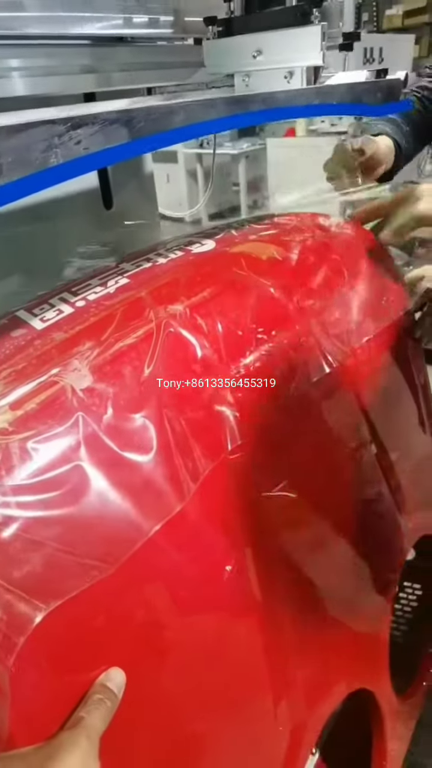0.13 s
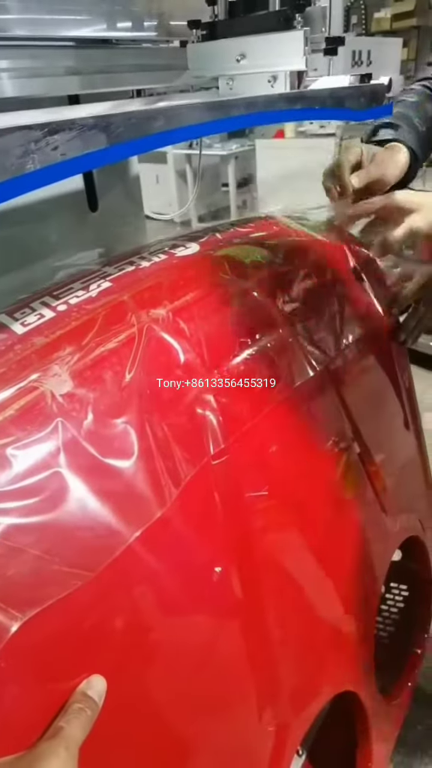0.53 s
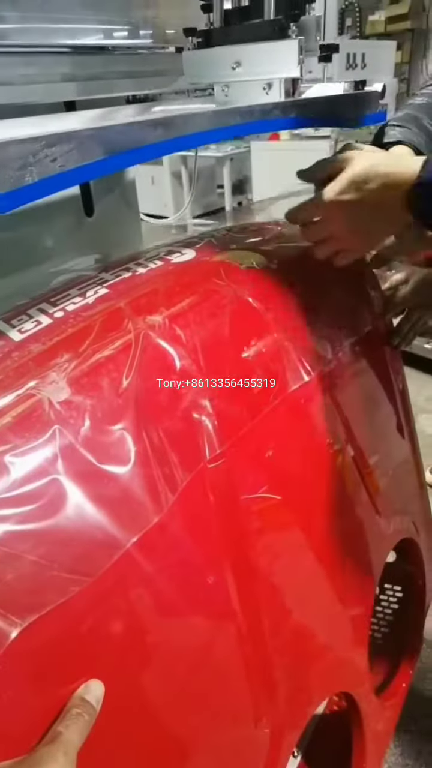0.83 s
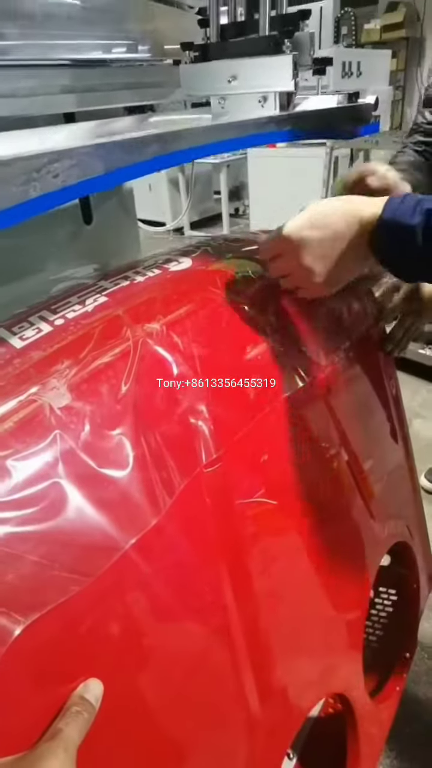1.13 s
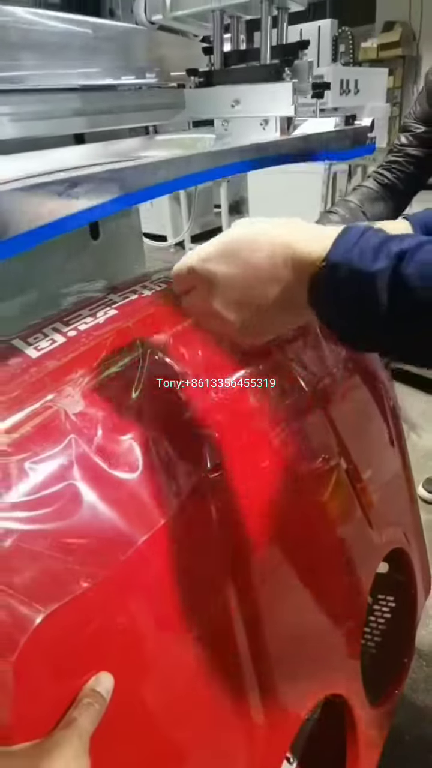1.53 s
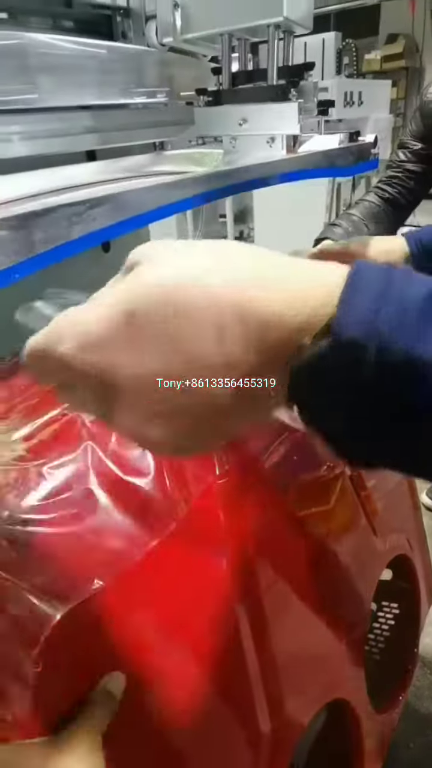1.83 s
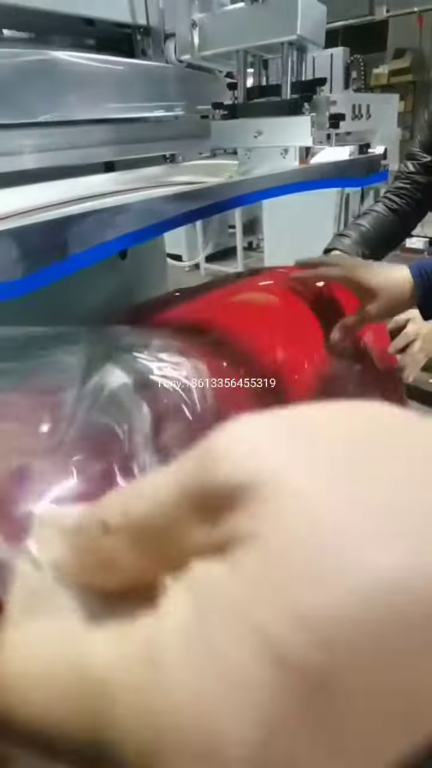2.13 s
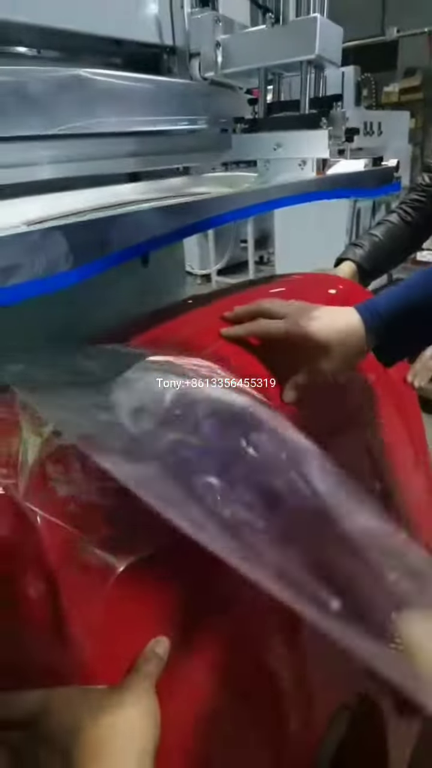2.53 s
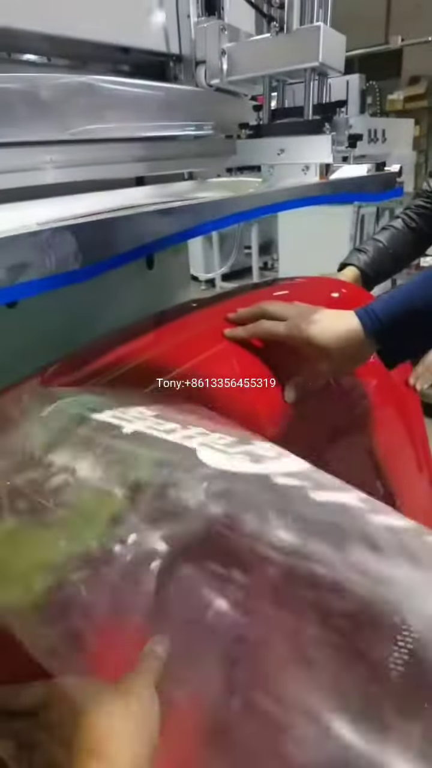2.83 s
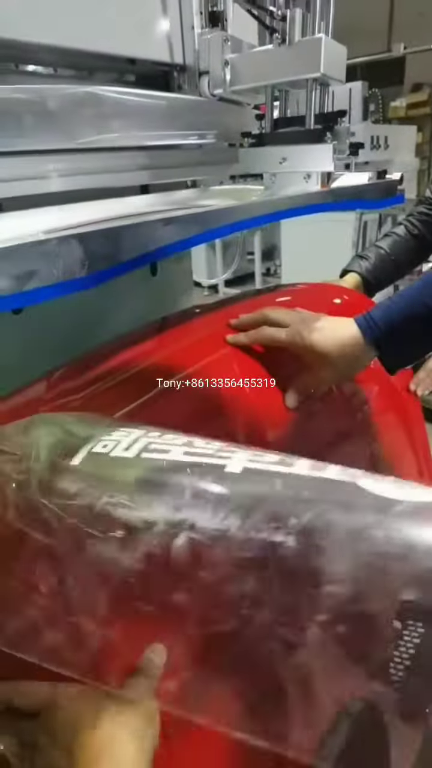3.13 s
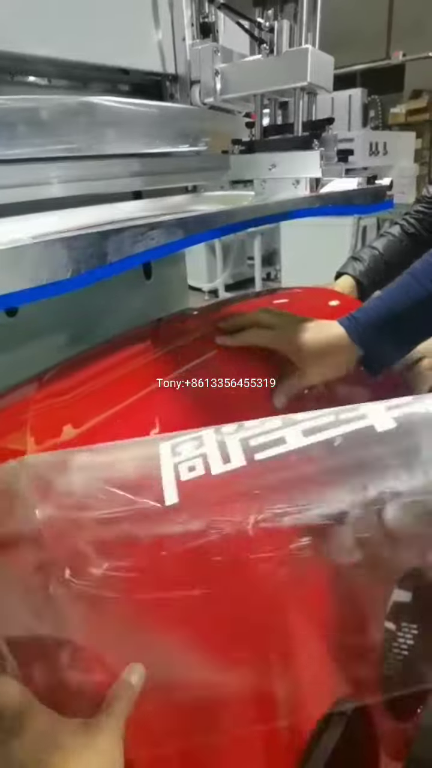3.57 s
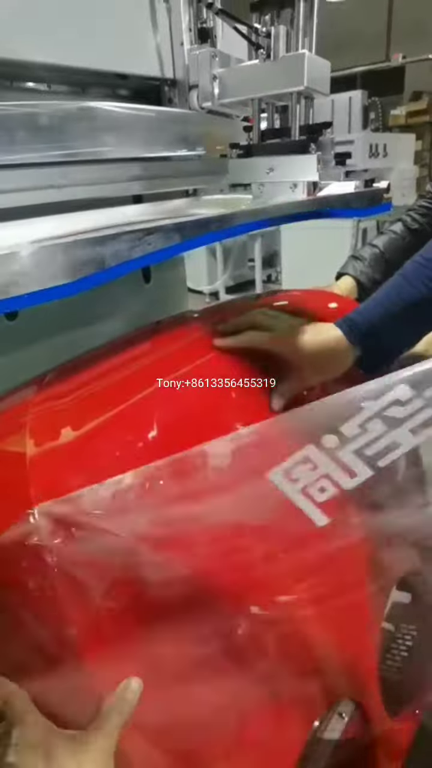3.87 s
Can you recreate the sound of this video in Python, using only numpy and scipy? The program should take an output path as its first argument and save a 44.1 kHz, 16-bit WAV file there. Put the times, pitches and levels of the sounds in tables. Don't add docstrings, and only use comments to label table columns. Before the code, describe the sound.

Plastic film peels off a curved hollow casing with crackling rips and bright tearing hiss

```python
import sys
import numpy as np
from scipy import signal
from scipy.fft import rfft, irfft
from scipy.io import wavfile
from scipy.ndimage import uniform_filter1d, minimum_filter1d

SR = 44100
rng = np.random.default_rng(int(sys.argv[2]) if len(sys.argv) > 2 else 0)


def volts_from_decibels(level):
    exponent = np.asarray(level, float) / 20
    return 10 ** exponent


def store_pcm(level_fs):
    pcm = np.round(np.clip(level_fs, -1, 1) * 32767).astype(np.int16)
    wavfile.write(sys.argv[1], SR, np.atleast_2d(pcm).T)


N = 176400

# pitch_hz, density_db (per Hz)
MACHINE_RUMBLE = [(25, -10), (300, -2.5), (700, -7.5), (1500, -25.5), (4000, -11), (9000, -45)]
# pitch_hz, width_hz, level_db
MOTOR_HUM = [
    (51.5, 1, -8.5),
    (114, 19, -6),
    (196.7, 18, -9.5),
]
# start_s, level_db
MACHINE_LEVEL = [
    (0.0, -53),
    (0.62, -57),
    (4.0, -73.5),
]
# start_s, level_db, slack_body_db
PULLS = [
    [(0, -44, 9), (.035, -54, 7), (.09, -36, 0.5), (.19, -31, 2), (.26, -49.5, 11.5), (.35, -49, -0.5)],
    [(.42, -47, 2), (.5, -51, 12), (.65, -43.5, -7), (.79, -43.5, -3), (.84, -26.5, -6), (.9, -37.5, -4),
     (.97, -39.5, 1), (1.04, -32, -3.5), ],
    [(1.2, -26.5, -7.5), (1.47, -24, -7.5), (1.7, -22, -5.5), (1.81, -24, -7), (1.9, -23, -6),
     (2.15, -27.5, -2), (2.27, -30, -3.5), (2.33, -45.5, 5)],
    [(2.44, -68, 17.5), (2.56, -34.5, -3), (2.62, -37, -2), (2.8, -26.5, -3.5), (2.83, -32, -2),
     (2.9, -25.5, -2), (2.94, -29, -7), (3.05, -42.5, -2.5)],
    [(3.07, -40, 2), (3.165, -36.5, 1.5), (3.18, -43, 0)],
    [(3.2, -48.5, -2), (3.386, -43.5, 1), (3.393, -32, -3), (3.6, -32.5, -1), (3.626, -35, -5.5)],
    [(3.632, -38, 7.5), (3.67, -36.5, -1.5), (3.685, -31, -4), (3.82, -40, 3.5), (3.915, -39.5, -4),
     (3.935, -31, -9)],
]
# start_s, peak_db, t60_s
EARLY_RIPS = [(0.044, -20.5, 0.08), (0.1102, -9.5, 0.045), (0.164, -4, 0.1), (0.2054, -8, 0.13),
              (0.3723, -7.5, 0.0093), (0.4369, -12, 0.049), (0.4561, -10.5, 0.059), (0.4756, -10.5, 0.039),
              (0.5277, -5.5, 0.063), (0.555, -9.5, 0.057), (0.5651, -16, 0.048), (0.6, -12, 0.019),
              (0.6146, -7, 0.055), (0.6683, -14, 0.1), (0.715, -12, 0.021), (0.7333, -8.5, 0.025),
              (0.7628, -14, 0.075), (0.7816, -3.5, 0.029), (0.833, -17, 0.051), (0.8547, -9, 0.052),
              (0.8769, -10, 0.083), (0.9263, -10, 0.082), (1.0281, -11, 0.046), (1.058, -8.5, 0.037),
              (1.1315, -8, 0.038), (1.167, -19, 0.035)]
# start_s, peak_db, t60_s
SMALL_RIPS = [(0.0593, -13, 0.13), (0.1038, -28, 0.014), (0.1424, -15, 0.033), (0.1776, -19, 0.099),
              (0.4895, -7, 0.029), (0.4943, -13.5, 0.12), (0.536, -29, 0.1), (0.675, -9.5, 0.018),
              (0.6854, -23, 0.03), (0.6952, -14, 0.015), (0.7436, -16, 0.02), (0.756, -24, 0.039),
              (0.7892, -12.5, 0.025), (0.8056, -9, 0.049), (0.814, -22, 0.021), (0.9434, -13, 0.019),
              (1.0811, -6.5, 0.068), (1.1953, -15, 0.039), (1.2034, -5.5, 0.043), (2.313, -22, 0.017),
              (2.3296, -24, 0.025), (2.3454, -17, 0.014), (2.357, -23, 0.04), (2.4584, -21, 0.018),
              (2.467, -25, 0.027), (2.4814, -14.5, 0.017), (2.5114, -16, 0.021), (2.9267, -21, 0.03)]
# start_s, peak_db, t60_s
LATE_RIPS = [(2.378, -16.5, 0.084), (2.4072, -19, 0.036), (2.4221, -17.5, 0.098), (2.4499, -14, 0.1),
             (2.4956, -16, 0.035), (2.5067, -19, 0.014), (2.5263, -13, 0.032), (2.5526, -11.5, 0.052),
             (2.587, -11.5, 0.016), (3.058, -10.5, 0.038), (3.0844, -12, 0.025), (3.1125, -16, 0.035),
             (3.1223, -12.5, 0.044), (3.1354, -14, 0.032), (3.158, -18, 0.032), (3.167, -13, 0.048),
             (3.2118, -22, 0.027), (3.2224, -19.5, 0.061), (3.2974, -15.5, 0.02), (3.349, -15.5, 0.1),
             (3.3907, -17, 0.038), (3.4374, -9, 0.035), (3.5554, -27, 0.02), (3.5696, -12.5, 0.038),
             (3.6293, -9.5, 0.059), (3.679, -18.5, 0.032), (3.8697, -18, 0.045), (3.89, -21, 0.02),
             (3.925, -15.5, 0.028), (3.9687, -10.5, 0.045)]
# start_s, peak_db
FAINT_RIPS = [(0.835, -5.5), (0.9188, -20), (2.3867, -25), (2.412, -19), (2.4273, -18.5), (2.4776, -14),
              (2.539, -17), (2.5742, -12), (2.68, -16), (3.005, -20), (3.024, -23), (3.0338, -21.5),
              (3.078, -19), (3.103, -17.5), (3.1466, -18), (3.2387, -20), (3.2685, -27), (3.3044, -27),
              (3.3355, -19.5), (3.342, -14), (3.3614, -19), (3.3918, -21), (3.4543, -12), (3.905, -14),
              (3.9492, -14)]
# pitch_hz, density_db (per Hz)
TAUT_FILM = [(900, -47), (1600, -25.5), (3000, -13), (5200, -12.5), (7500, -11.5), (9400, -8.5),
             (11500, -9.5), (15400, -8)]
# pitch_hz, density_db (per Hz)
SLACK_BODY = [(150, -7), (300, -6.5), (750, 2), (1500, 1), (3000, 0), (4600, -7), (6500, -51)]
# centre_s, length_s, pitch_hz, level_db
BOOMS = [
    (0.19, 0.12, 635, -42.5),
    (1.658, 0.18, 773, -38.5),
    (1.883, 0.08, 820, -41.5),
    (2.18, 0.29, 321, -47.5),
    (2.51, 0.14, 320, -55),
    (3.585, 0.053, 576, -48),
]
# start_s, treble_db
APPROACH = [
    (0, -19),
    (.8, -3.5),
    (1.5, -1),
]
# start_s, length_s
CHOPPED = [(.03, .025), (.095, .025), (.355, .125), (.525, .02), (.59, .015), (.655, .15), (.908, .025),
           (1.058, .022), (2.36, .145), (3.04, .025), (3.19, .045), (3.297, .065), (3.618, .022),
           (3.873, .06)]
# start_s, length_s, low_hz, high_hz
LOST_BANDS = [(.612, .018, 3000, 3900), (.635, .028, 5100, 6900), (1.125, .035, 2900, 3900),
              (1.145, .015, 4800, 6500), (1.225, .04, 3200, 4300), (1.335, .04, 3200, 5200),
              (1.405, .033, 3300, 6300), (1.52, .025, 3500, 6000), (1.595, .055, 3700, 6800),
              (1.682, .032, 4100, 6800), (1.8, .022, 3500, 6800), (1.893, .035, 4400, 6300),
              (1.96, .13, 4700, 5300), (2.0, .035, 4600, 6500), (2.148, .018, 4500, 6700),
              (2.232, .045, 4600, 5700), (2.39, .115, 5900, 7600), (2.655, .025, 5800, 7800),
              (2.745, .02, 5800, 7000), (2.79, .022, 3400, 5000), (2.83, .025, 3600, 6700),
              (2.915, .025, 4500, 6700), (3.195, .04, 4500, 6500), (3.28, .018, 5400, 6500),
              (3.32, .042, 4500, 7600), (3.405, .02, 4500, 6700), (3.45, .03, 4500, 6600),
              (3.53, .02, 4500, 6400), (3.58, .02, 4300, 5000), (3.665, .03, 4500, 6500),
              (3.77, .045, 4500, 6500), (3.895, .03, 3600, 7200), (3.935, .022, 3800, 7800)]


def rms_one(x):
    return x / np.sqrt(np.mean(x ** 2) + 1e-20)


def in_time(rows):
    s, *columns = np.transpose(rows)
    return [np.interp(np.arange(N) / SR, s, c) for c in columns]


def drift(rate_hz):
    r = np.exp(-40 * np.pi * rate_hz / SR)
    noise = rng.standard_normal(N // 20 + 2002)
    slow = signal.lfilter([1], [1, -2 * r, r * r], noise)[2000:]
    return np.interp(np.arange(N) / 20, np.arange(len(slow)), rms_one(slow))


def bank(x, spectrum, patchy_db, rate_hz):
    hz, db = np.transpose(spectrum)
    octave = np.log2(np.maximum(np.arange(N // 2 + 1) * SR / N, 1))
    fall_db = 30 * np.maximum(octave - np.log2(hz[-1]), 0)
    shape = volts_from_decibels(np.interp(octave, np.log2(hz), db, left=-90) - fall_db)
    whole = rfft(x) * shape / np.sqrt(np.mean(shape ** 2))
    out = 0
    for centre in np.arange(np.log2(hz[0]), np.log2(SR / 2), .5):
        band = irfft(whole * np.maximum(1 - 2 * abs(octave - centre), 0), N)
        out = out + volts_from_decibels(patchy_db * drift(rate_hz)) * band
    return out


def resonate(x, hz, width_hz):
    r = np.exp(-np.pi * width_hz / SR)
    rise = np.array([1, 0, -1]) * (1 - r * r) / 2
    return signal.lfilter(rise, [1, -2 * r * np.cos(2 * np.pi * hz / SR), r * r], x)


def machines():
    hum = sum(volts_from_decibels(db) * rms_one(resonate(rng.standard_normal(N), hz, width))
              for hz, width, db in MOTOR_HUM)
    rumble = bank(rng.standard_normal(N), MACHINE_RUMBLE, 1.5, 1.26)
    return volts_from_decibels(in_time(MACHINE_LEVEL)[0] + 7.5) * (rumble + hum)


def slips(level_db):
    slips_per_s, spread_db, clump_db = 14000, 2.05, 1.47
    tears_per_s, tear_db, tear_t60_s = 74, -41.5, 0.01
    sizes = volts_from_decibels(spread_db * np.minimum(rng.exponential(1, N), 5)) * rng.choice([-1, 1], N)
    clicks = rms_one(sizes * (rng.random(N) < slips_per_s / SR))
    tears = (rng.random(N) < tears_per_s / SR) * np.minimum(rng.exponential(1, N), 2.5)
    tears = signal.lfilter([1], [1, -volts_from_decibels(-60 / (tear_t60_s * SR))], tears)
    steady = volts_from_decibels(level_db + clump_db * drift(25))
    return clicks * (steady + volts_from_decibels(tear_db + 0.11 * (level_db + 38)) * tears)


def rips():
    gain_db, rise_s, crack_s, tail_share, faint_t60_s = -5.5, 0.0005, 0.0012, 0.98, 0.018
    out, t = np.zeros(N + SR), np.arange(SR // 8) / SR
    rows = list(EARLY_RIPS) + list(SMALL_RIPS) + list(LATE_RIPS)
    rows += [(s, db, faint_t60_s) for s, db in FAINT_RIPS]
    size = (len(rows), len(t))
    grains = rng.standard_normal(size) * rng.exponential(1, size) ** 0.25
    for (s, db, t60), grain in zip(rows, grains):
        tail = tail_share * volts_from_decibels(-60 * t / max(t60, .005))
        burst = grain * (tail + np.exp(-t / crack_s)) * np.minimum(t / rise_s, 1)
        peak = 2.92 * np.std(burst[:SR // 300])
        start = int(s * SR)
        out[start:start + len(t)] += volts_from_decibels(db + gain_db) * burst / peak
    return out[:N]


def booms():
    t, out = np.arange(N) / SR, 0
    for centre_s, length_s, hz, db in BOOMS:
        width_hz = 0.33 * hz
        tone = resonate(resonate(rng.standard_normal(N), hz, width_hz), hz, width_hz)
        out = out + volts_from_decibels(db) * rms_one(tone) * np.exp(-(2 * (t - centre_s) / length_s) ** 4)
    return out


def shop(x):
    t60_s, level_db = 0.033, -17
    t = np.arange(SR // 2) / SR
    tail = rng.standard_normal(len(t)) * volts_from_decibels(-60 * t / t60_s) * (t > .006)
    tail = signal.lfilter([1], [1, -.3], tail)
    return volts_from_decibels(level_db) * signal.fftconvolve(x, tail / np.sqrt(np.sum(tail ** 2)))[:N]


def below(x, hz, rest_db):
    return irfft(rfft(x) * np.where(np.arange(N // 2 + 1) * SR / N < hz, 1, volts_from_decibels(rest_db)), N)


def approach(x):
    low = signal.filtfilt(*signal.butter(2, 11000, fs=SR), x)
    return low + volts_from_decibels(in_time(APPROACH)[0]) * (x - low)


def microphone_port(x):
    return x + volts_from_decibels(4.0) * resonate(x, 9050, 900)


def round_peaks(x):
    limit = .45
    gain = np.minimum(1, limit / (1e-9 - minimum_filter1d(-abs(x), size=45)))
    return x * uniform_filter1d(gain, size=45)


def weak_bands_cut_db(hz, z, chopped, luck):
    power = uniform_filter1d(uniform_filter1d(abs(z) ** 2, size=5, axis=0), size=3, axis=1)
    db = 10 * np.log10(power + 1e-18)
    loudest_db = -minimum_filter1d(-db.max(axis=0), size=17)
    spared_db = 6 * ((hz > 8160) | (hz < 4320))
    margin_db = db - loudest_db + 14.5 + spared_db + 6 * luck
    return -32 * chopped * (hz > 2700) * np.clip(.5 - margin_db / 2, 0, 1)


def lost_bands_cut_db(hz, t, chopped, luck):
    lost_share, stray_share, ragged_s = .84, .1, .004
    rows, frames = np.arange(len(hz)), np.arange(len(t))
    share = stray_share * (hz > 2700) * (hz < 8160) + 0 * t
    for s, length_s, low_hz, high_hz in LOST_BANDS:
        late = ragged_s * rng.standard_normal((len(rows), 2))[rows // 2]
        when = (t > s + late[:, :1]) & (t < s + length_s + late[:, 1:])
        where = (hz > low_hz) & (hz < high_hz)
        share = np.maximum(share, (lost_share + chopped) * (when * where))
    draw = rng.random((len(rows), len(t)))[rows // 2][:, (frames + 4) // 16]
    return -32 * np.clip((share - draw) * 10, 0, 1) * (1 - chopped * (luck > 1.3))


def thin_out(x, hiss_top_hz):
    hz, t, z = signal.stft(x, SR, nperseg=256, noverlap=192)
    rows, frames, hz = np.arange(len(hz)), np.arange(len(t)), hz[:, None]
    chopped = sum(np.clip(np.minimum(t - s, s + length_s - t) / .002 + .5, 0, 1)
                  for s, length_s in CHOPPED)
    luck = rng.standard_normal((len(rows), len(t)))[rows // 4][:, frames // 4]
    cut_db = weak_bands_cut_db(hz, z, chopped, luck) + lost_bands_cut_db(hz, t, chopped, luck)
    cut_db = cut_db - 40 * (hz > hiss_top_hz + 200) * (1 - np.minimum(chopped, 1))
    return signal.istft(z * volts_from_decibels(cut_db), SR, nperseg=256, noverlap=192)[1][:N]


HISS_TOP_HZ = 14060


def scene():
    level_db, body_db = in_time(np.concatenate(PULLS))
    peel, torn = slips(level_db), rips()
    near = bank(torn, TAUT_FILM, -3, 40.0)
    hiss = bank(peel, TAUT_FILM, 0.44, 7.3)
    drive = volts_from_decibels(-9 + body_db) * peel + volts_from_decibels(-18.5) * torn
    film = hiss + bank(drive, SLACK_BODY, 2.8, 17.0)
    far = film + shop(film + near) + booms() + machines()
    both = below(far, HISS_TOP_HZ, -90) + below(near, HISS_TOP_HZ, -15)
    return approach(both)[None]


def roll_off(x):
    return signal.sosfilt(signal.butter(12, 15400, fs=SR, output="sos"), x)


def record(dry):
    heard = round_peaks(microphone_port(dry[0]))
    mix = thin_out(heard, HISS_TOP_HZ)[None]
    return roll_off(mix)


dry = scene()
out = record(dry)
store_pcm(out)
```